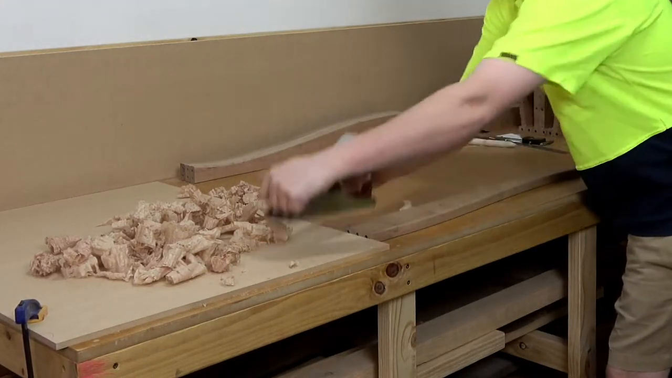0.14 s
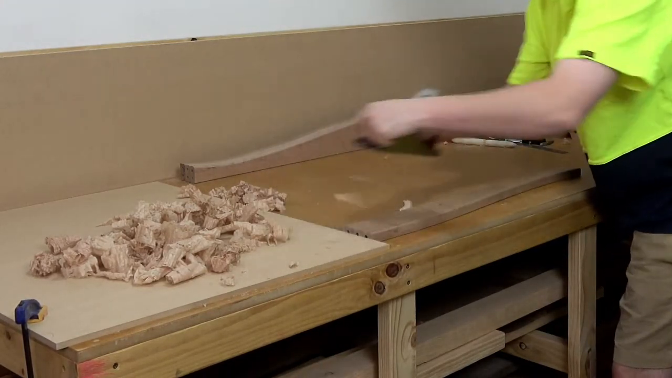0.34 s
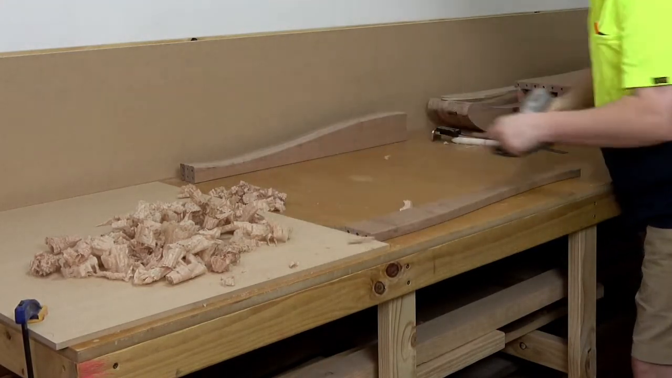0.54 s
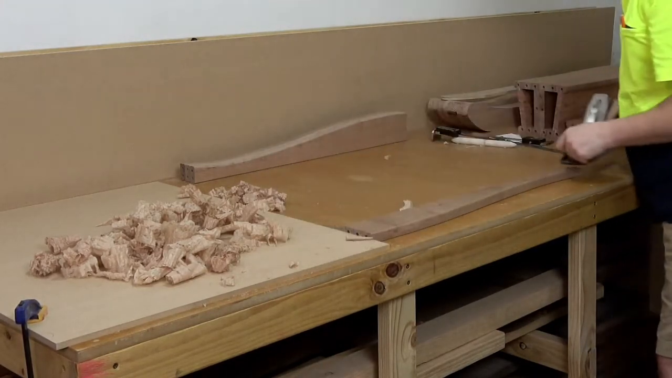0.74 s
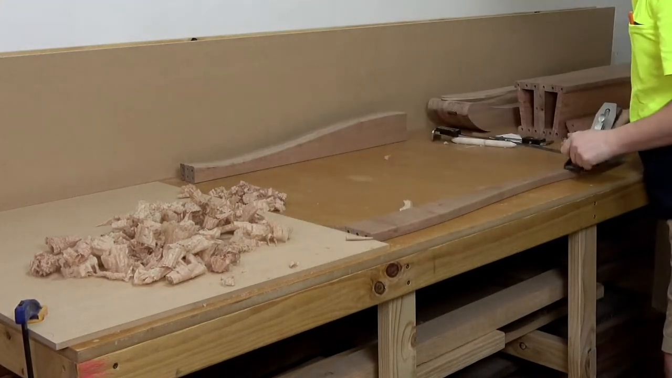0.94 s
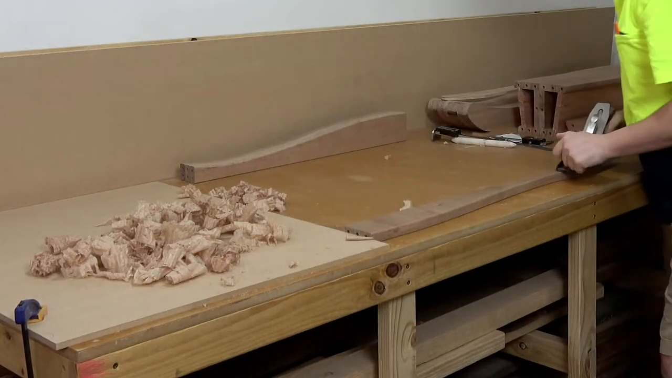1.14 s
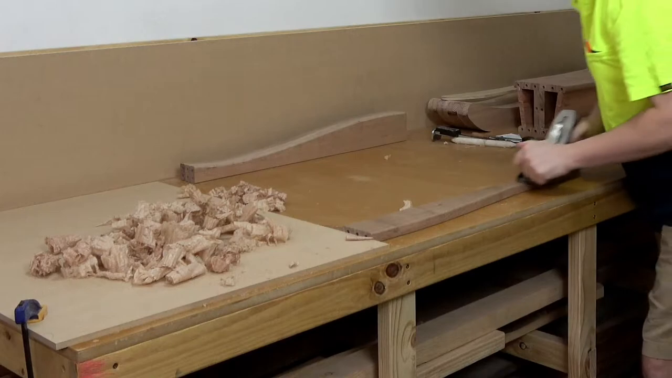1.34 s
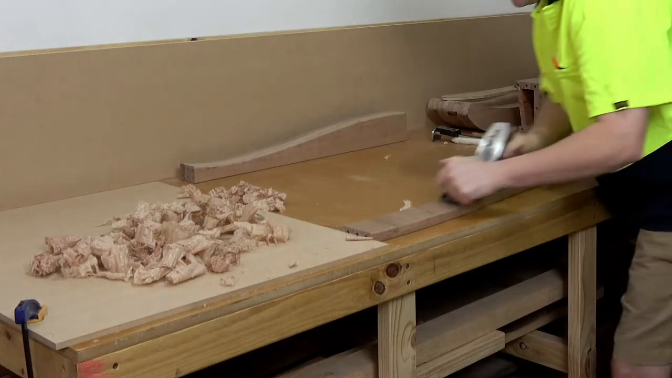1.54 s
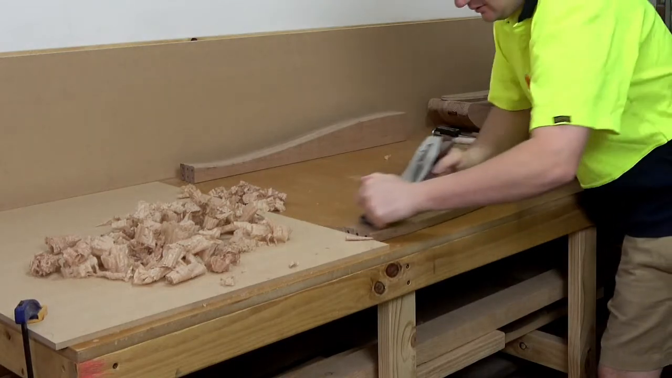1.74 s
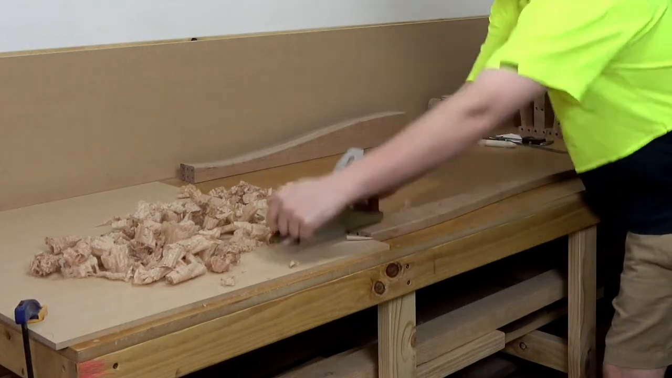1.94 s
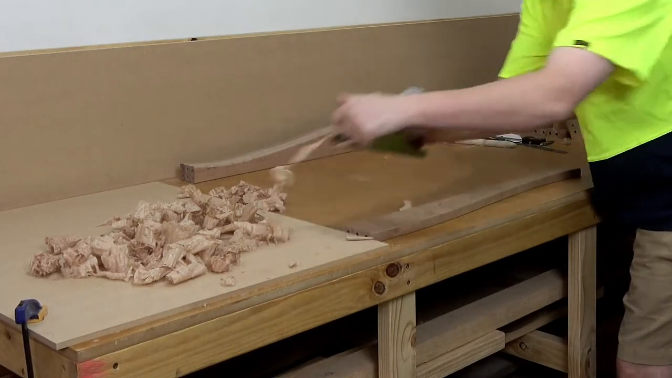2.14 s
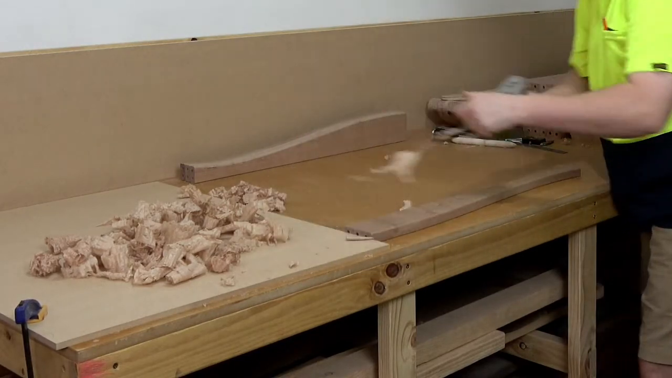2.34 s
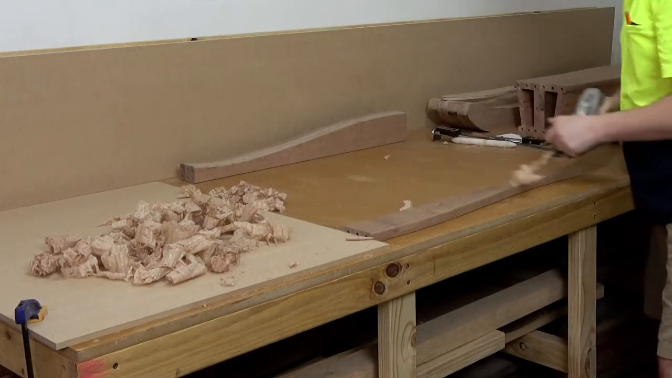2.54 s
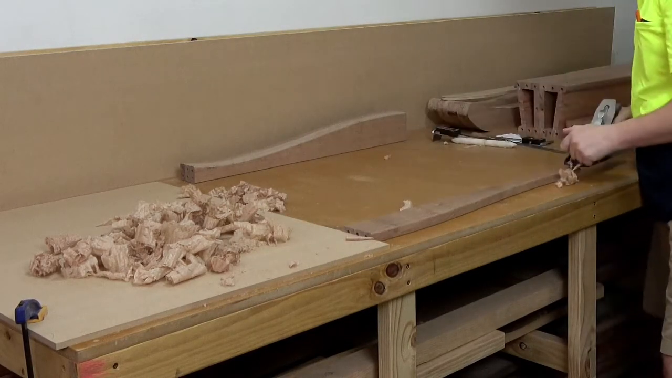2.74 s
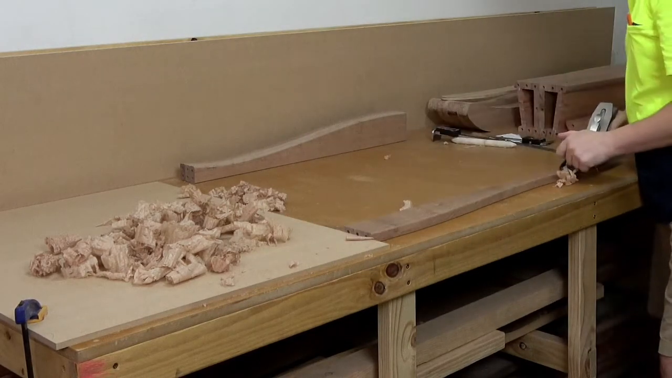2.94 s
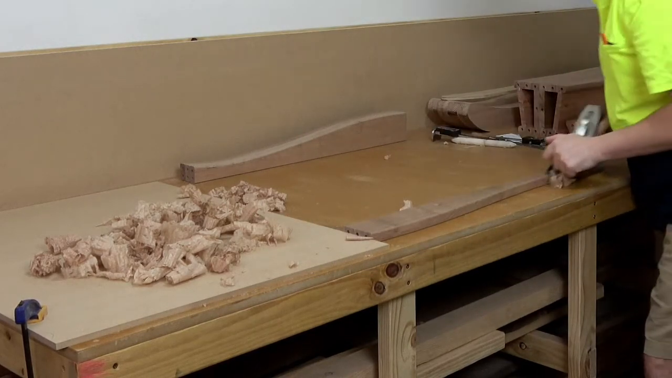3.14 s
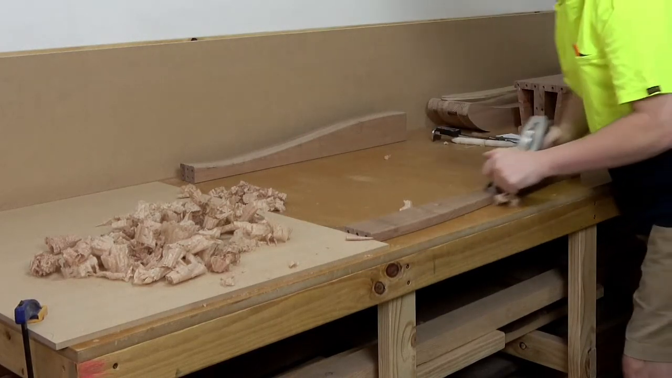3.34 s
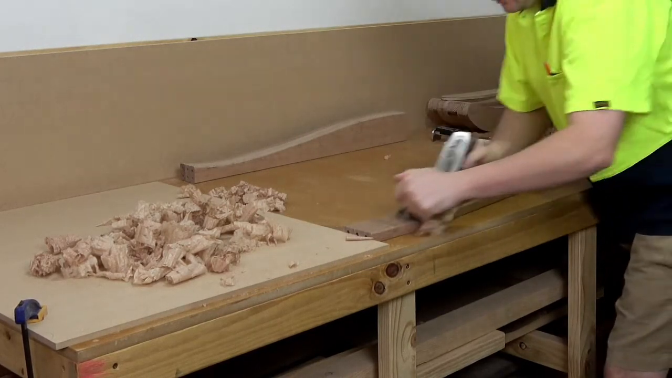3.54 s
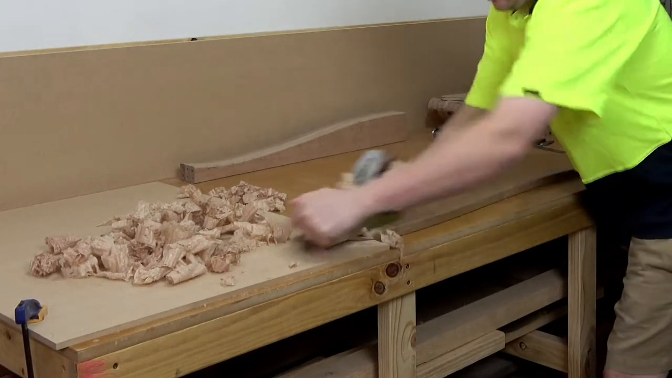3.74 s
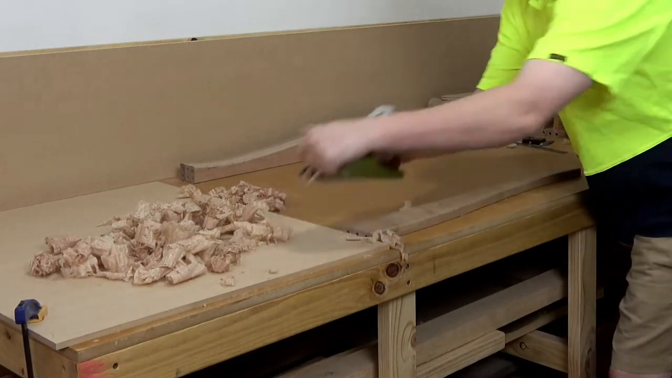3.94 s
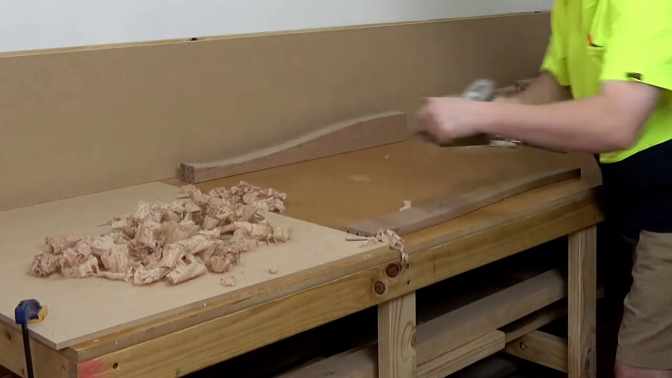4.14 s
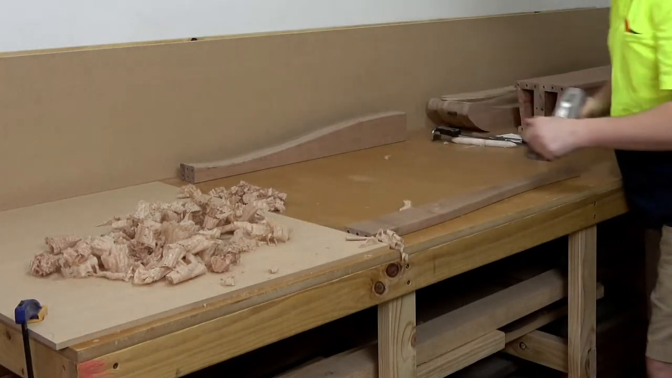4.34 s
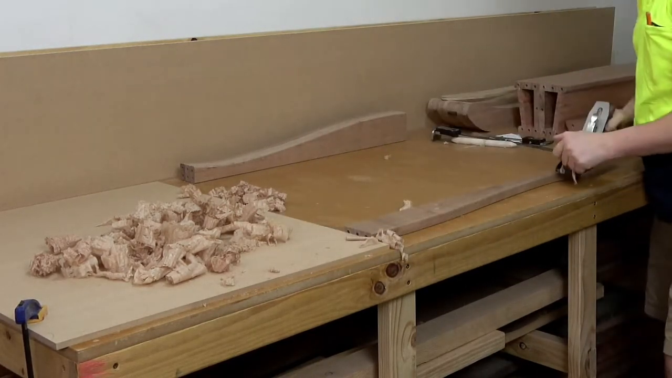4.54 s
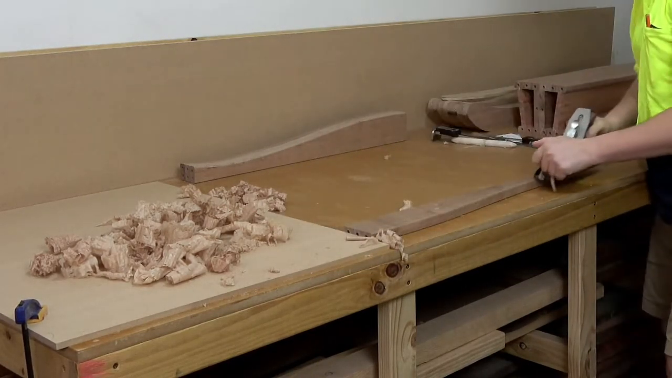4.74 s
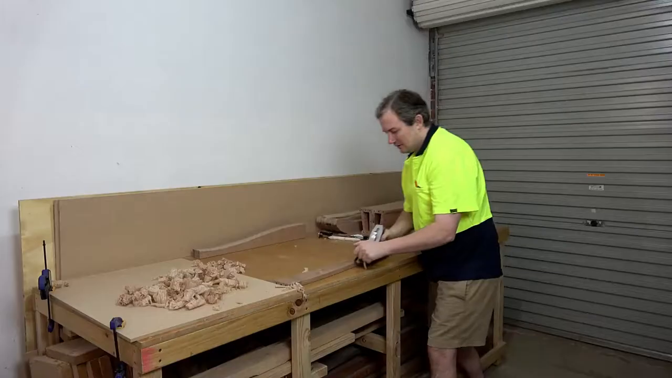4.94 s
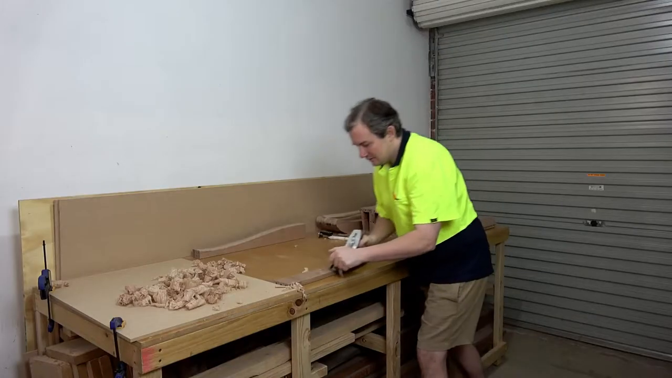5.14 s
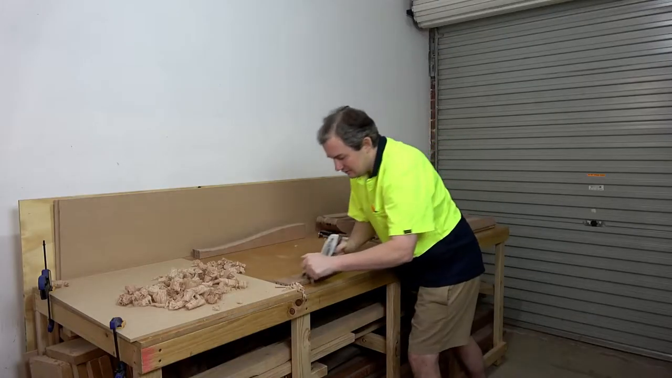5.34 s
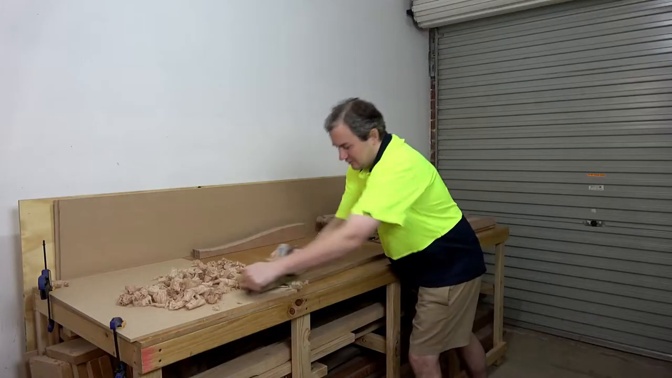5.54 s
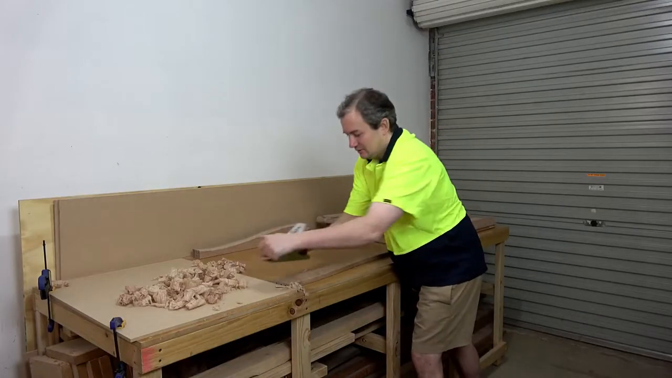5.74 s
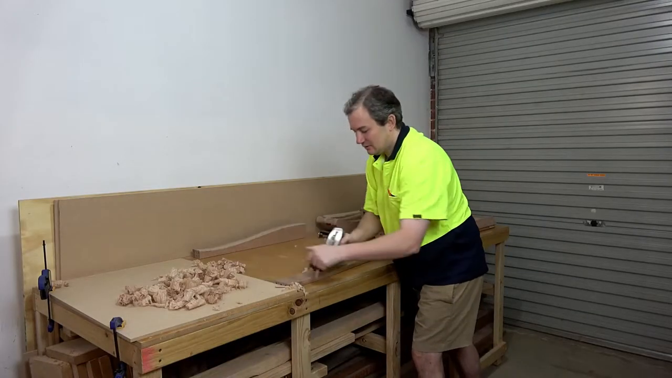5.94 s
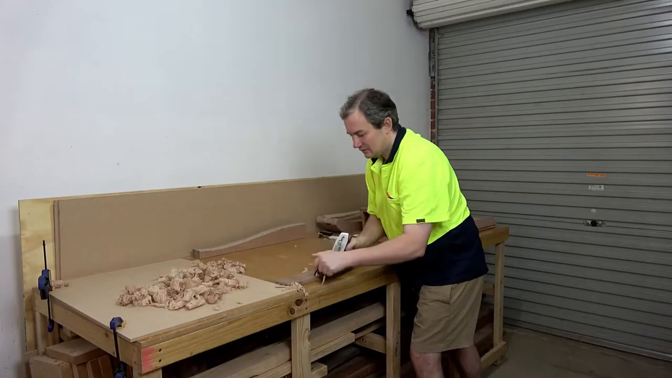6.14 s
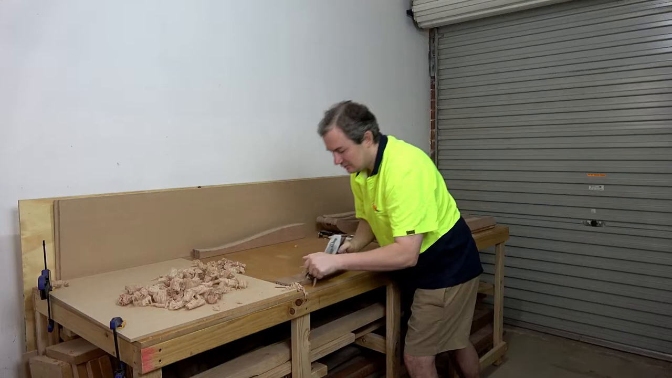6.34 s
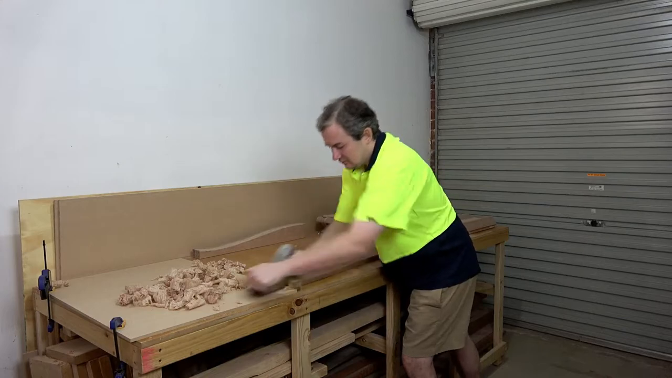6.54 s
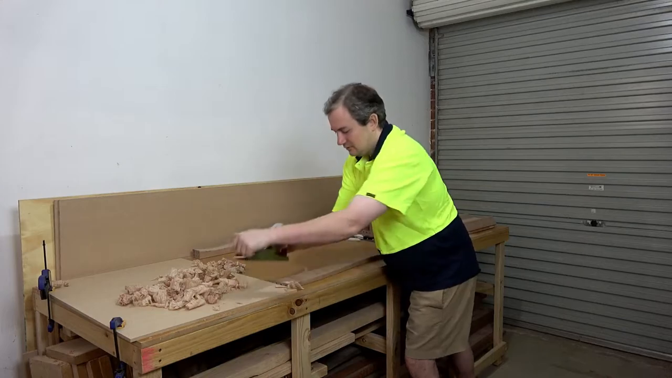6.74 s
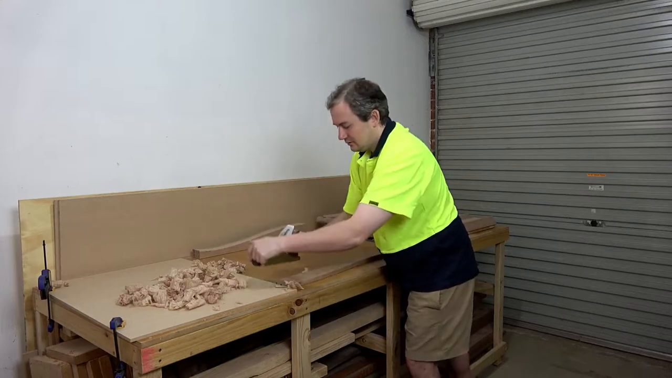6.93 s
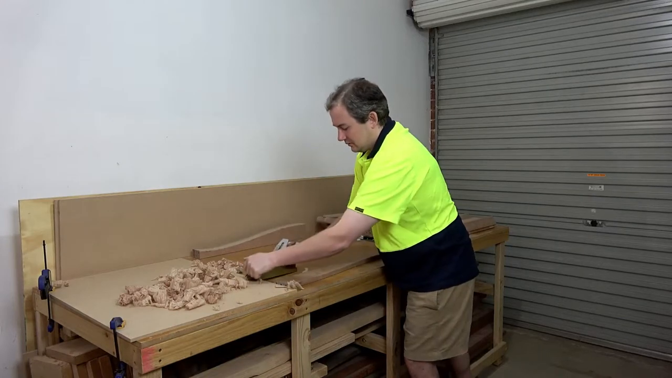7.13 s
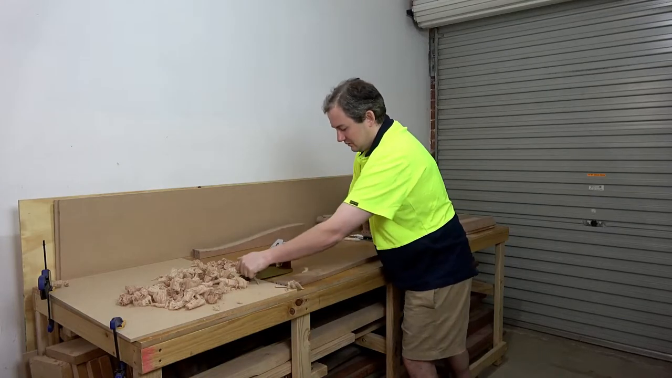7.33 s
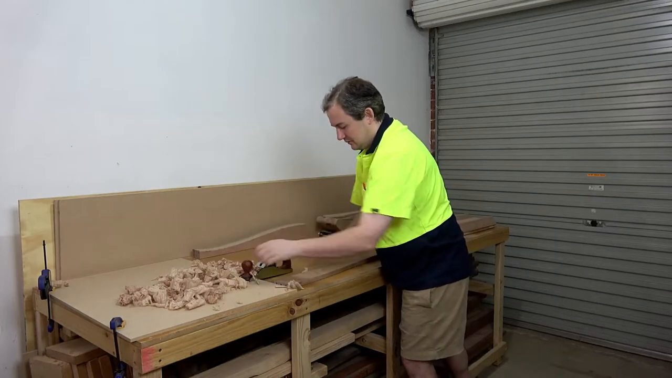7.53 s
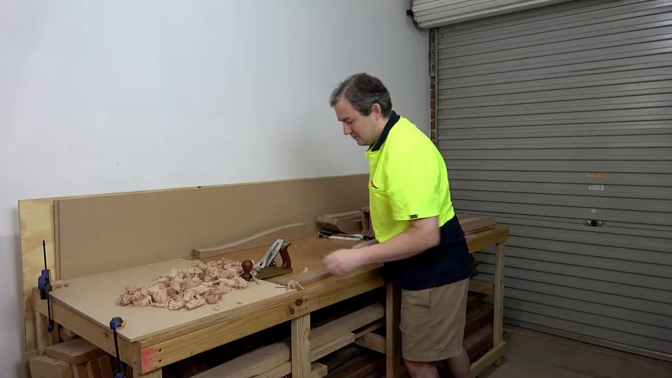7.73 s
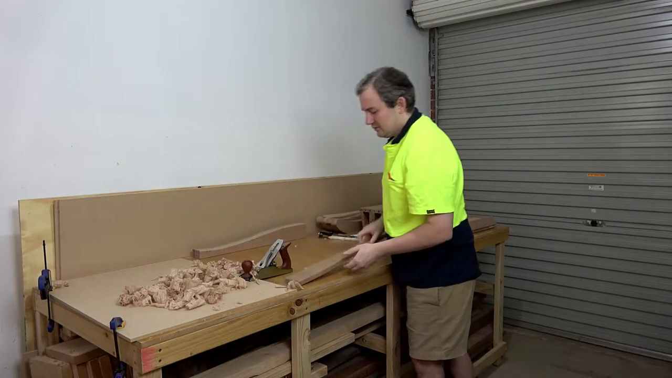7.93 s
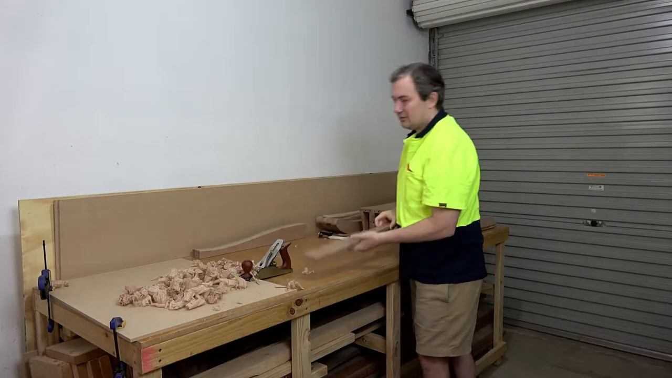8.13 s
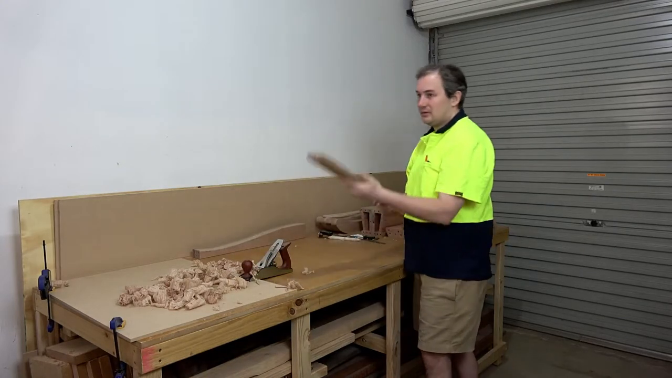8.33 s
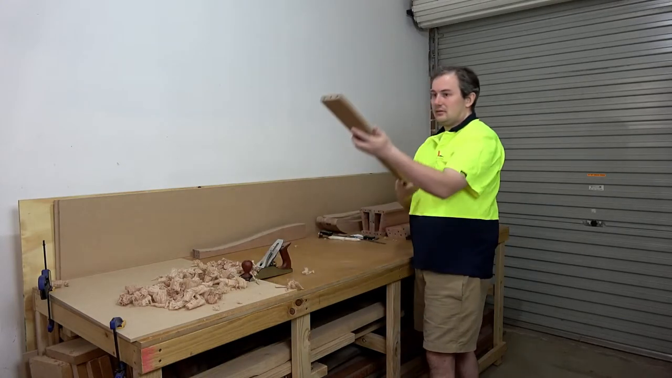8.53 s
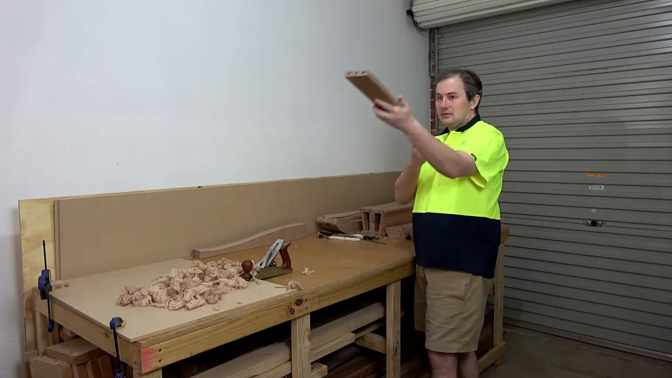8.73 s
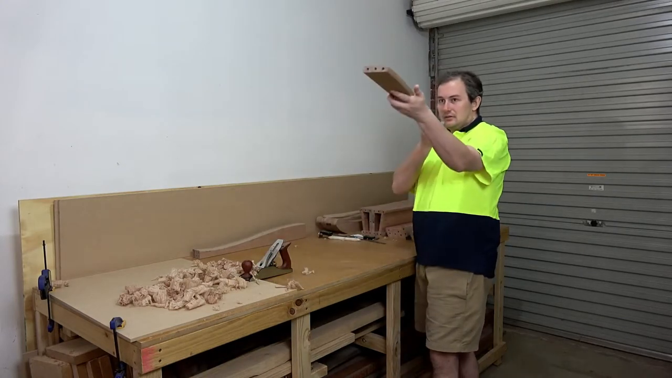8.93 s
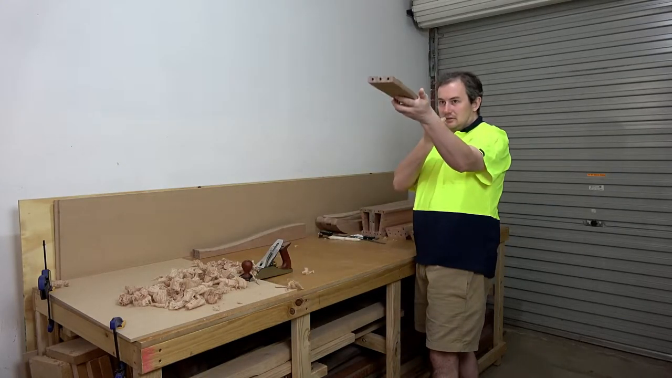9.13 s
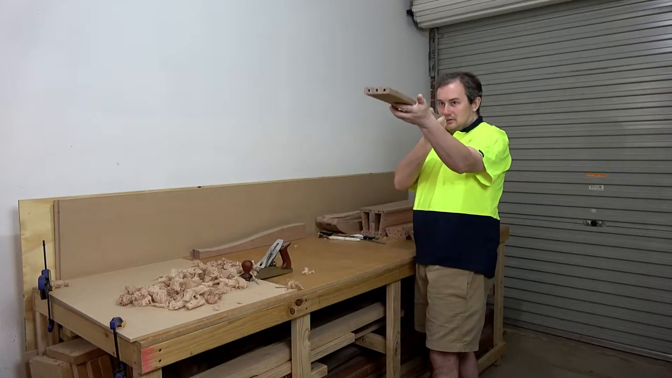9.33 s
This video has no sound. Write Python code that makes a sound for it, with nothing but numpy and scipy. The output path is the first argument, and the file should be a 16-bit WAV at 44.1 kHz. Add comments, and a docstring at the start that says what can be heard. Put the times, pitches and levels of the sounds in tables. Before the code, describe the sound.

In a small, slightly echoing workshop, a hand plane shaves a board with swishing, crackly strokes, heard from nearby. Sharp knocks and hollow bench thuds mark it landing and dropping off the end, and cloth rustles softly between passes. After the fifth stroke the plane is set aside loudly and the board is dragged away in one short scrape. A far vehicle hums underneath, and a bird chirps faintly at the close.

```python
"""Hand planing in a bare workshop

A metal plane is set down, pushed along a board, lifted and swung back: five strokes, the first already under way.
Fibres snap, the blade rasps, the shaving hisses; landings boom through the bench and duck a limiter.
At last the plane is put aside and the board slid off. Outside, a vehicle gathers speed and a bird twitters."""
import sys
import numpy as np
from scipy import signal
from scipy.fft import rfft, irfft
from scipy.io import wavfile

SR = 44100
rng = np.random.default_rng(int(sys.argv[2]) if len(sys.argv) > 2 else 0)


def dump(signal):
    """Clip the signal to [-1, 1] and save it as 16-bit WAV at the path in sys.argv[1]."""
    limited = np.clip(np.atleast_2d(signal).T, -1, 1)
    pcm = np.round(limited * 32767).astype(np.int16)
    wavfile.write(sys.argv[1], SR, pcm)


N = 413640
TIME = np.arange(N) / SR

# plane strokes: start/s, end/s, run-up/s, cut/dB, final rasp/dB, rasp growth/dB, shaving/dB,
# mid-board rumble boost/dB, drop off the end/dB
STROKES = [(-0.5, 0.041, 0.17, -24, -21.5, -4, -31.5, 0, -11),
           (1.133, 1.896, 0.13, -23, -24.5, -3, -30.5, 12, -6.5),
           (3.053, 3.753, 0.2, -23.5, -22.5, 5.5, -32.5, 6, -25.5),
           (5.037, 5.531, 0.21, -24, -18, 15, -29.5, -2, -18),
           (6.239, 6.549, 0.27, -24.5, -21, 9, -32, -30, -16.5)]
# plane or board hits the bench: t/s, relative clack/dB, contact sharpness/Hz, relative boom/dB
KNOCKS = [(0.8846, 5, 2270, 3.5), (1.111, -8, 600, -3.5), (1.129, -3, 554, -7), (2.87, 12.5, 3300, 10),
          (2.989, -5, 600, -2.5), (4.714, -9.5, 1120, -10), (4.919, 4.5, 1890, 9), (6.170, 6.5, 794, 2.5),
          (7.133, -8.5, 2980, -1), (7.143, 7, 1510, 11), (7.178, 0.5, 600, 0.5), (7.237, -4.5, 1230, 3.5),
          (7.648, -26, 1500, -22.5), (7.928, -10.5, 910, -13.5)]
# spectra of cut wood, shaving hiss and board rumble: f/Hz, density/dB
CUT = [(500, -43), (900, -9), (1250, -3), (1600, -3), (2000, 1.5), (2400, -2), (2800, -1.5), (3300, -13.5),
       (4500, -8), (16000, -32.5)]
SHAVING = [(2500, -19.5), (4500, -6.5), (7000, -1.5), (9000, -4.5), (11000, -9.5), (12700, -14),
           (15700, -17)]
BOARD = [(50, -33), (120, -2), (320, -1), (420, 6.5), (560, -6), (750, -0.5), (1000, -6.5), (1800, -33),
         (5000, -36)]


def from_db(db):
    """Decibels to gain."""
    return 10 ** (np.asarray(db) / 20)


def unit_rms(x):
    """Scale to rms 1."""
    return x / np.sqrt(np.mean(x ** 2) + 1e-20)


def at_hz(points, hz):
    """Interpolate a table over log frequency."""
    freqs, values = np.transpose(points)
    return np.interp(np.log(np.maximum(hz, 1)), np.log(freqs), values)


def coloured(x, spectrum):
    """Give a steady excitation a spectrum; rms 1."""
    gain = from_db(at_hz(spectrum, np.fft.rfftfreq(N, 1 / SR)))
    return unit_rms(irfft(rfft(x) * gain, N))


def drift(rate_hz):
    """Low-passed random wander; rms 1."""
    rolloff = 1 + (np.fft.rfftfreq(N, 1 / SR) / rate_hz) ** 2
    return unit_rms(irfft(rfft(rng.standard_normal(N)) / rolloff, N))


def swell(peak_s, rise_s, fade_db_per_s):
    """Gain of a movement that speeds up to a peak, then dies away."""
    t = TIME - peak_s
    return np.clip(1 + t / rise_s, 0, 1) ** 2 * from_db(-fade_db_per_s * np.maximum(t, 0))


def resonance(x, hz, width_hz):
    """Two-pole band-pass, peak gain 1."""
    r = np.exp(-np.pi * width_hz / SR)
    poles = [1, -2 * r * np.cos(2 * np.pi * hz / SR), r * r]
    return signal.lfilter((1 - r * r) / 2 * np.array([1, 0, -1]), poles, x + 1e-18)


def ring(x, hz, t60_s):
    """Damped mode: a unit click starts a sine of height 1."""
    r, w = np.exp(-np.log(1000) / (t60_s * SR)), 2 * np.pi * hz / SR
    return signal.lfilter([0, np.sin(w)], [1, -2 * r * np.cos(w), r * r], x + 1e-18)


def body(x, modes):
    """A solid body lifts a few narrow bands; rms 1."""
    return unit_rms(x + sum(from_db(db) * resonance(x, hz, width) for hz, width, db in modes))


def fibres(per_s, spread_db, judder_db, judder_hz):
    """Tiny, uneven snaps of wood fibres, modulated by contact judder; rms 1."""
    sizes = from_db(spread_db * np.minimum(rng.exponential(1, N), 5)) * rng.choice([-1, 1], N)
    snaps = sizes * (rng.random(N) < per_s / SR)
    return unit_rms(snaps * from_db(judder_db * drift(judder_hz)))


def travelling(x, depth_db, width_hz, hold_s, size=1024):
    """A contact moving along the board briefly favours ever other bands; rms 1."""
    spectra = signal.stft(x, nperseg=size)[2]
    field = rng.standard_normal(spectra.shape)
    for axis, span in enumerate([width_hz * size / SR, hold_s * SR * 2 / size]):
        pole = np.exp(-1 / span)
        field = signal.filtfilt([1 - pole], [1, -pole], field, axis=axis, padtype="even")
    field = np.clip(field / np.std(field[size // 16:-size // 16]), -2, 2)
    return unit_rms(signal.istft(spectra * from_db(depth_db * field), nperseg=size)[1][:N])


def workshop(x, wet_db, build_s=0.0009):
    """Direct sound plus a diffuse tail that decays band by band; power is kept."""
    # reverberation: f/Hz, t60/s
    decay = [(80, 1), (250, 0.7), (600, 0.54), (1500, 0.6), (4000, 0.66), (6500, 0.58), (16000, 0.36)]
    t, tail = TIME[:SR], 0
    edges_hz = np.geomspace(40, 18000, 15)
    for low, high in zip(edges_hz, edges_hz[1:]):
        bandpass = signal.butter(2, [low, high], "band", fs=SR, output="sos")
        band = signal.sosfilt(bandpass, rng.standard_normal(SR))
        t60_s = at_hz(decay, np.sqrt(low * high))
        envelope = (1 - np.exp(-t / build_s)) * np.exp(-np.log(1000) * t / t60_s)
        tail = tail + unit_rms(band * envelope) * np.sqrt(high - low)
    reverb = signal.fftconvolve(x, unit_rms(tail) / np.sqrt(SR))[:N]
    wet = from_db(wet_db)
    return (x + wet * reverb) / np.sqrt(1 + wet ** 2)


def background(air_db=-51.5, hum_hz=99.0, hum_db=-51.0):
    """Dull outdoor rumble and faint mains hum."""
    # outdoor air: f/Hz, density/dB
    spectrum = [(20, -17), (45, -14), (75, -10), (130, -4.5), (280, -6.5), (400, -12), (1000, -15),
                (3300, -22), (4000, -19), (4700, -26), (15700, -33)]
    air = coloured(rng.standard_normal(N), spectrum)
    return from_db(air_db) * air + from_db(hum_db) * np.sin(2 * np.pi * hum_hz * TIME)


def bird(chirp_s=0.0456, fall_share=0.133):
    """Thin, wavering, falling whistles."""
    # calls: t/s, start f/Hz, level/dB
    chirps = [(8.425, 6900, -48), (8.465, 6950, -47), (8.505, 6730, -50), (8.645, 6900, -56),
              (8.715, 6650, -52), (8.881, 6700, -54), (8.94, 6500, -51), (9.14, 3750, -51),
              (9.215, 2600, -58)]
    out, waver = np.zeros(N), 1 + 0.018 * drift(150)
    for s, start_hz, db in chirps:
        at, n = int(s * SR), int(chirp_s * SR)
        hz = start_hz * np.linspace(1, 1 - fall_share, n) * waver[at:at + n]
        out[at:at + n] += from_db(db) * np.sqrt(np.hanning(n)) * np.sin(2 * np.pi * np.cumsum(hz) / SR)
    return workshop(out, wet_db=-5.0)


def vehicle(harmonics=8, upper_db=3.0):
    """A far engine drones; harmonics 1 and 2 swell as they cross resonances of door and room."""
    # engine speeds up, then eases off: t/s, firing rate/Hz, base level/dB
    engine = [(0, 41.7, -52.5), (.9, 43.4, -56), (2.55, 58, -50.5), (4.2, 74, -49.5), (6.0, 85.5, -49.5),
              (6.85, 72.8, -61), (7.7, 63, -62), (9.38, 64.7, -55)]
    # door and room resonances: f/Hz, width/Hz, boost/dB
    modes = [(58.7, 6.3, 11), (74.7, 3.7, 7), (87.3, 5.5, 11.5), (166.7, 14, 8.5)]
    # upper harmonics through the door: f/Hz, relative level/dB
    door = [(125, -27), (167, 2.5), (200, -9), (255, -11.5), (300, -3), (400, -22.5), (700, -17)]
    times, rates, levels = np.transpose(engine)
    firing_hz = np.interp(TIME, times, rates)
    phase = 2 * np.pi * np.cumsum(firing_hz * (1 + 0.0018 * drift(6.9))) / SR
    drone = 0
    for k in range(1, harmonics + 1):
        if k <= 2:
            gain_db = sum(db / (1 + (2 * (k * firing_hz - hz) / width) ** 2) for hz, width, db in modes)
        else:
            gain_db = upper_db + at_hz(door, k * firing_hz) + 2 * drift(1.6)
        drone = drone + from_db(gain_db) * np.sin(k * phase)
    return from_db(np.interp(TIME, times, levels)) * drone


def clothes():
    """Cloth brushes on cloth as the arms swing back."""
    # arm swings: peak/s, rise/s, level/dB, fade/(dB/s)
    swishes = [(0.46, 0.21, -37, 22), (2.28, 0.21, -36.5, 24), (4.21, 0.28, -38.5, 19),
               (6.06, 0.29, -47.5, 42), (6.87, 0.45, -46, 43), (8.38, 0.75, -38, 95)]
    # cloth friction: f/Hz, density/dB
    spectrum = [(150, -19), (500, -3.5), (900, -6), (1800, -1.5), (2800, -3), (4000, 0.5), (5000, -7.5),
                (7000, -14), (10000, -19), (15700, -26)]
    gain = sum(from_db(db) * swell(s, rise, fade) for s, rise, db, fade in swishes)
    return workshop(gain * coloured(rng.standard_normal(N), spectrum), wet_db=-13.0)


def sliding_board(scrape_db=-26.5, rumble_db=-32, free_ring_db=15):
    """The board is dragged ever faster off the bench, then shifts in the hands, ringing more freely."""
    # loose board: f/Hz, width/Hz, boost/dB
    modes = [(370, 19, 5), (1726, 20, 10), (1900, 62, -4), (2430, 110, -14), (3720, 570, 10.5)]
    # pulls through the hands: peak/s, level/dB
    pulls = [(7.68, -50), (8.59, -47), (8.77, -55)]
    rub = fibres(per_s=6700, spread_db=2.5, judder_db=2.0, judder_hz=22)
    scrape, rumble = coloured(rub, CUT), coloured(rub, BOARD)
    on_bench = from_db(scrape_db) * body(scrape, modes) + from_db(rumble_db) * body(rumble, modes)
    in_hands = body(scrape, [(hz, width, db + free_ring_db) for hz, width, db in modes])
    drag = swell(peak_s=8.005, rise_s=0.31, fade_db_per_s=296)
    pull = sum(from_db(db) * swell(s, rise_s=0.13, fade_db_per_s=62) for s, db in pulls)
    return workshop(drag * on_bench + pull * in_hands, wet_db=-0.5)


def bench_frame(highpass_hz=70):
    """Legs and frame thud under the worker's weight."""
    # heavy pushes: t/s, level/dB
    thuds = [(4.93, -33), (6.185, -25.5), (6.312, -25.5), (7.151, -27), (7.242, -29)]
    # frame: f/Hz, level/dB, t60/s
    modes = [(83.8, -4, 0.65), (98, 4, 0.36)]
    pushes, push_samples = np.zeros(N), SR // 400
    for s, db in thuds:
        pushes[int(s * SR):][:push_samples] = from_db(db) / push_samples
    thud = sum(from_db(db) * ring(pushes, hz, t60) for hz, db, t60 in modes)
    return signal.sosfilt(signal.butter(4, highpass_hz, "high", fs=SR, output="sos"), thud)


def chips(base_db=-53, clack_share=0.66, lag_s=0.0032):
    """Each knock crushes loose chips: a brief, faint crunch."""
    gain = sum(from_db(base_db + clack_share * db) * swell(s + lag_s, rise_s=0.0056, fade_db_per_s=114)
               for s, db, _, _ in KNOCKS)
    crunch = fibres(per_s=9000, spread_db=4.0, judder_db=1.0, judder_hz=52)
    return workshop(gain * coloured(crunch, SHAVING), wet_db=-11.0)


def blows(drop_clack_db=-1, drop_sharp_hz=2200, rock_s=0.024, rock_clack_db=-23, rock_boom_db=-7.0):
    """Knocks and drops off the board's end; each rocks back once, softer and duller. Rows as KNOCKS."""
    drops = [(end, db + drop_clack_db, drop_sharp_hz, db) for _, end, *_, db in STROKES]
    first = list(KNOCKS) + drops
    rocks = [(s + rock_s, clack + rock_clack_db, 0.81 * sharp_hz, boom + rock_boom_db)
             for s, clack, sharp_hz, boom in first]
    return first + rocks


def knocks(heel_lag_s=0.0032, toe_db=-16.5, scatter_s=0.0119, clack_db=24.5, boom_db=-19.5):
    """Toe lands, then heel: a clack as sharp as the contact, and a push that sets the bench booming."""
    # bench: f/Hz, level/dB, t60/s
    bench_modes = [(142.8, -3.5, 0.37), (161.3, -7, 0.56), (210.1, 0, 0.26), (237.4, -2.5, 0.35),
                   (267.4, -5, 0.3), (301.3, -2, 0.14), (330, -15, 0.62), (378.6, 0, 0.24), (418, -1, 0.12),
                   (466.8, -3, 0.2), (659, -1.5, 0.037), (836, -4.5, 0.069), (1110, -7, 0.059)]
    # iron sole on wood: f/Hz, width/Hz, level/dB
    clack_modes = [(358, 287, 5), (950, 540, 3.5), (1670, 2180, -0.5), (3260, 150, 3.5), (3860, 580, -2),
                   (8400, 26000, -37)]
    hits, count = blows(), len(bench_modes)
    contacts, pushes = np.zeros(N), np.zeros((count, N))
    touch = np.zeros(SR // 20)
    touch[0], touch[int(heel_lag_s * SR)] = from_db(toe_db), 1
    jitters_db = 0.61 * rng.standard_normal((len(hits), count))
    for (s, contact_db, sharp_hz, push_db), jitter_db in zip(hits, jitters_db):
        at = int(s * SR)
        softened = signal.lfilter(*signal.butter(2, sharp_hz, fs=SR), touch)
        contacts[at:at + len(touch)] += from_db(contact_db) * softened
        # bending waves reach the modes a few ms apart
        arrivals = at + (SR * (heel_lag_s + scatter_s * rng.random(count))).astype(int)
        pushes[np.arange(count), arrivals] = from_db(push_db + jitter_db) * rng.choice([-1, 1], count)
    clack = sum((-1) ** k * from_db(db) * resonance(contacts, hz, width)
                for k, (hz, width, db) in enumerate(clack_modes))
    boom = sum(from_db(db) * ring(push, hz, t60) for push, (hz, db, t60) in zip(pushes, bench_modes))
    sound = from_db(clack_db) * workshop(clack, wet_db=-0.4) + from_db(boom_db) * boom
    # an open bench radiates little deep bass
    return signal.sosfilt(signal.butter(2, 94.0, "high", fs=SR, output="sos"), sound)


def stroke_gains(run_off_s=0.17, lift_s=0.045, shaving_growth_db=20, rumble_db=-35.5):
    """Gains of cut, rasp, shaving and rumble: all follow speed; hiss grows as the shaving lengthens."""
    gains = np.zeros((4, N))
    for start, end, run_up, cut_db, rasp_db, growth_db, shaving_db, middle_db, _ in STROKES:
        during = (TIME > start) & (TIME < end + lift_s)
        t = TIME[during]
        speed = np.sin(np.pi / 2 * np.minimum((t - start) / run_up, 1)) ** 2
        contact = np.minimum(1 - (t - end) / lift_s, 1) ** 2
        along = np.minimum((t - start) / (end - start), 1)
        mid_board = np.exp(-((along - 0.55) / 0.13) ** 2)
        # toe overhangs the end: the cut thins, the shaving tears free
        run_off = np.clip(1 + (t - end) / run_off_s, 0, 1)
        gains[:, during] += speed * contact * from_db([
            cut_db - 5.5 * run_off,
            rasp_db - growth_db * (1 - along),
            shaving_db - shaving_growth_db * (1 - along) + 5 * run_off,
            rumble_db + middle_db * mid_board])
    return gains


def planing():
    """The blade breaks fibres and rasps, the shaving hisses from the mouth, the board rumbles."""
    # plane body and blade: f/Hz, width/Hz, boost/dB
    plane_modes = [(9230, 71, 0), (13700, 170, -3)]
    # blade rasp: f/Hz, density/dB
    rasp_spectrum = [(2200, -16.5), (3100, -3), (3600, 0), (4100, 1.5), (4600, -5.5), (5300, -12.5),
                     (6500, -22), (10000, -40), (16000, -58)]
    cut_gain, rasp_gain, shaving_gain, rumble_gain = stroke_gains()
    snaps = fibres(per_s=14000, spread_db=2.5, judder_db=1.2, judder_hz=90)
    chatter = fibres(per_s=16000, spread_db=2.0, judder_db=1.2, judder_hz=90)
    tearing = fibres(per_s=14000, spread_db=0.5, judder_db=1.5, judder_hz=110)
    rubbing = fibres(per_s=3000, spread_db=1.0, judder_db=2.5, judder_hz=14)
    cut = travelling(coloured(snaps, CUT), depth_db=2.8, width_hz=70, hold_s=0.02)
    rasp = travelling(coloured(chatter, rasp_spectrum), depth_db=2.3, width_hz=60, hold_s=0.015)
    hiss = coloured(tearing, SHAVING)
    wood = cut_gain * cut + rumble_gain * coloured(rubbing, BOARD)
    iron = rasp_gain * body(rasp, plane_modes) + shaving_gain * body(hiss, plane_modes)
    return workshop(wood, wet_db=-4.5) + workshop(iron, wet_db=-5.5)


def scene():
    """Mono mix on both channels."""
    work = planing() + knocks() + chips() + bench_frame() + sliding_board() + clothes()
    mix = work + vehicle() + bird() + background()
    return np.array([mix, mix])


def record(dry, threshold_db=-12.0, release_db_per_s=96.0, ceiling=0.72, cutoff_hz=15750):
    """A limiter ducks on loud knocks and recovers; soft clip, then low-pass."""
    window_s, attack_s, lookahead_s = 0.0098, 0.00065, 0.00063

    def smooth(x, tau_s):
        pole = np.exp(-1 / (tau_s * SR))
        return signal.lfilter([1 - pole], [1, -pole], x)

    level_db = 10 * np.log10(smooth(np.mean(dry ** 2, axis=0), window_s) + 1e-12)
    excess_db = np.maximum(level_db - threshold_db, 0)
    release_db = release_db_per_s * TIME
    duck_db = smooth(np.maximum.accumulate(excess_db + release_db) - release_db, attack_s)
    limited = dry * from_db(-np.interp(TIME + lookahead_s, TIME, duck_db))
    rounded = ceiling * np.tanh(limited / ceiling)
    return signal.sosfilt(signal.ellip(10, 0.1, 80, cutoff_hz, fs=SR, output="sos"), rounded)


dry = scene()
out = record(dry)
dump(out)
```